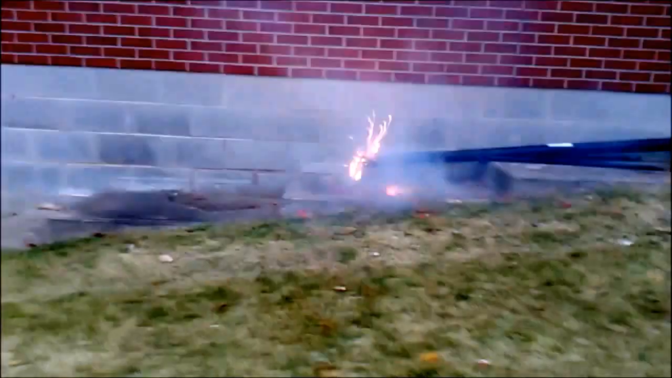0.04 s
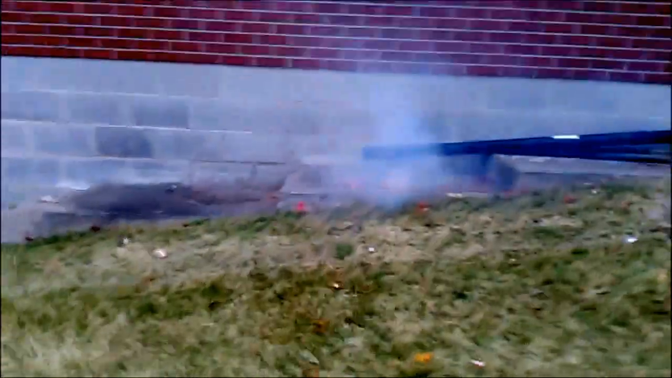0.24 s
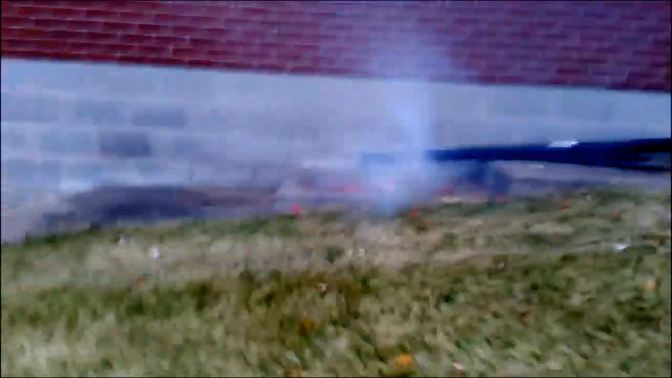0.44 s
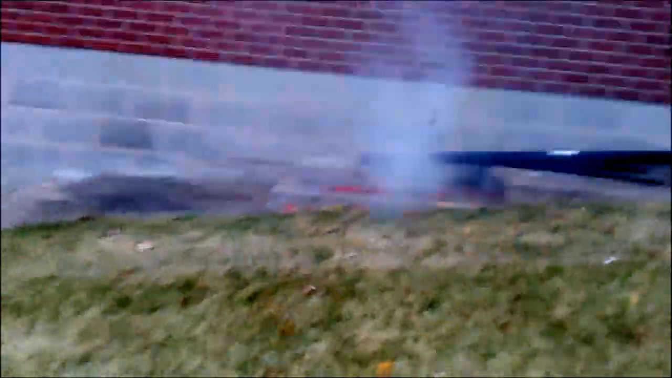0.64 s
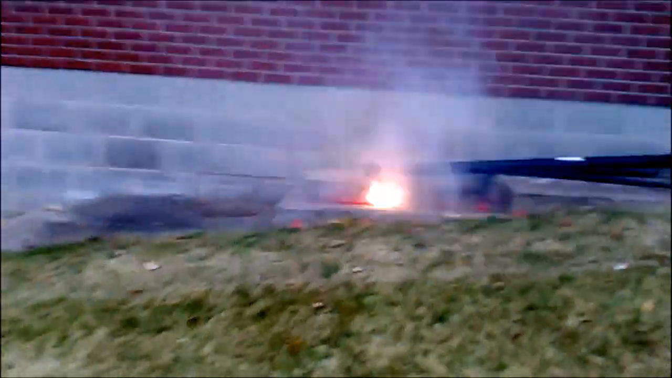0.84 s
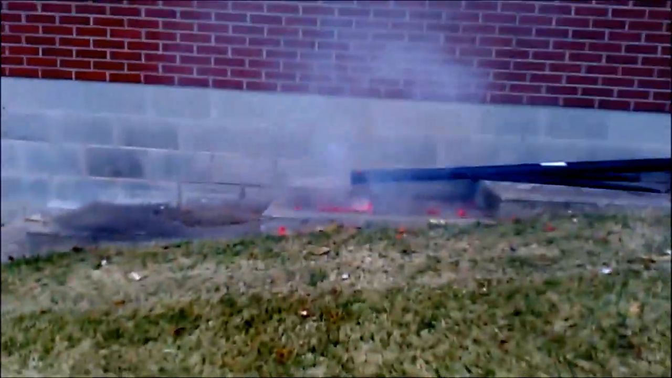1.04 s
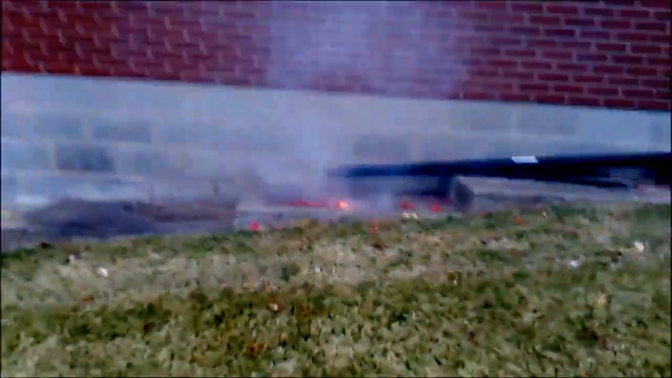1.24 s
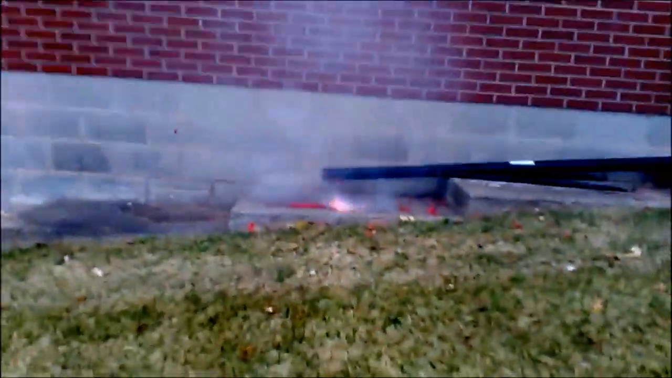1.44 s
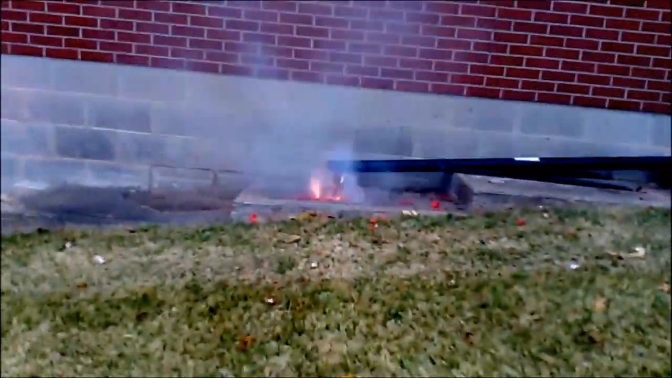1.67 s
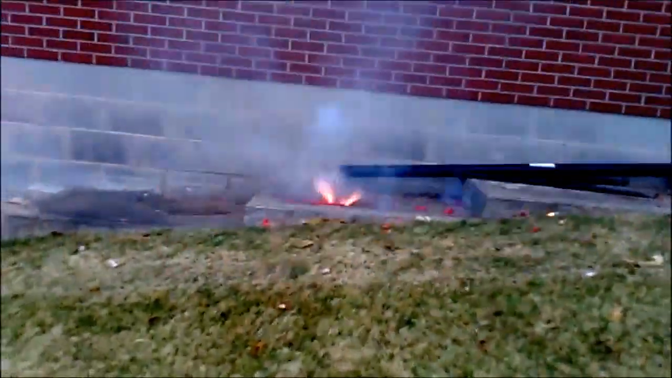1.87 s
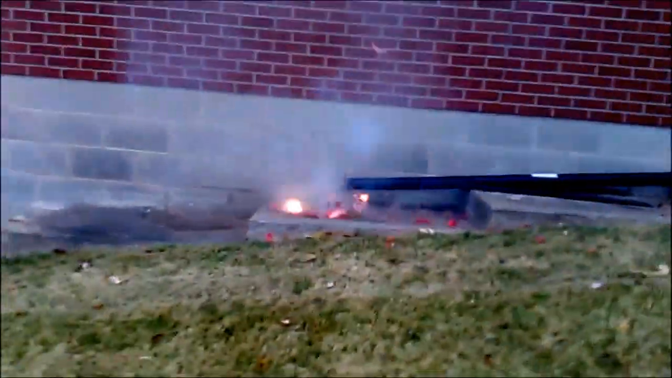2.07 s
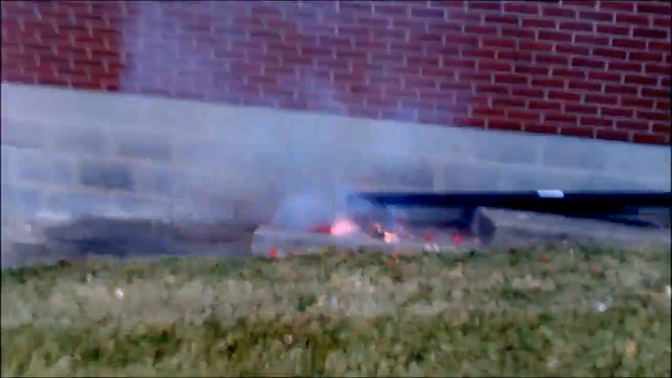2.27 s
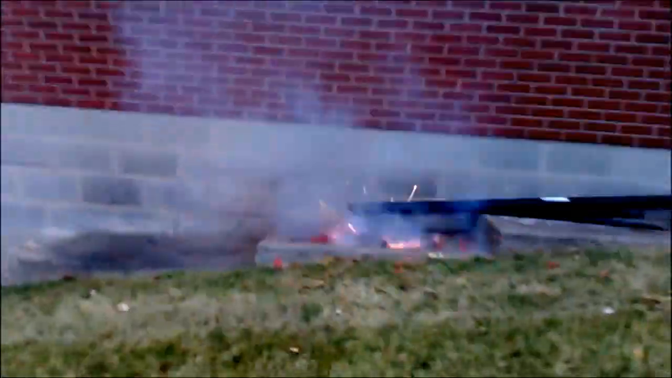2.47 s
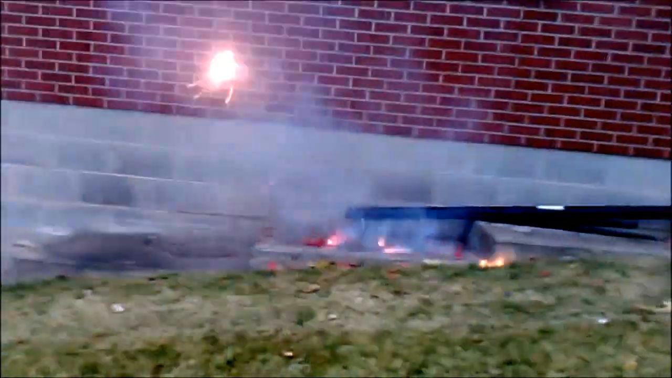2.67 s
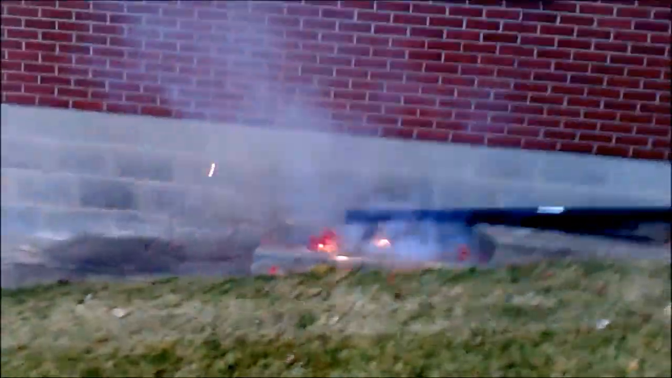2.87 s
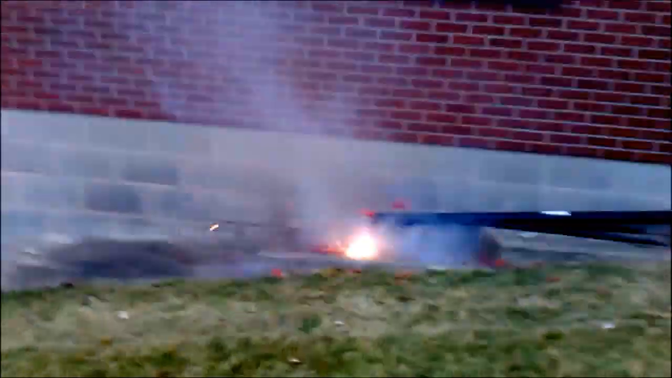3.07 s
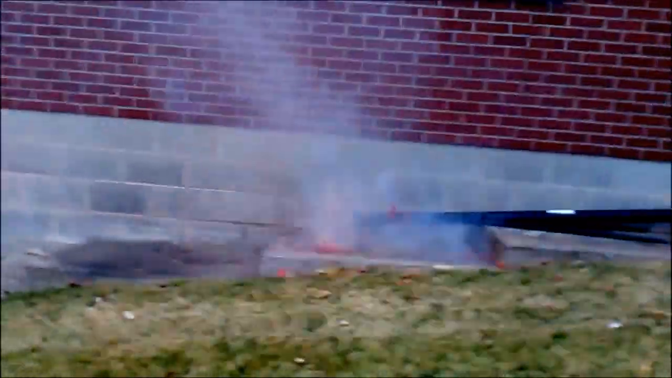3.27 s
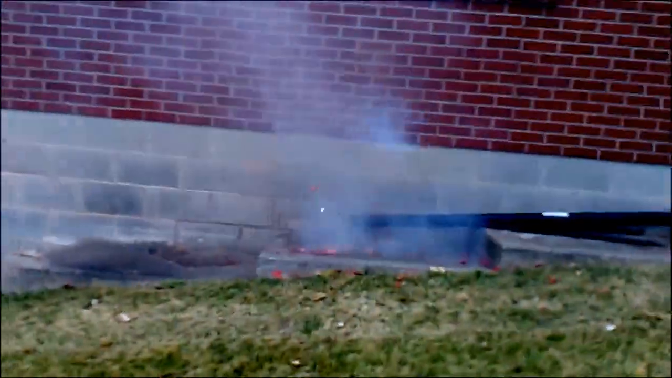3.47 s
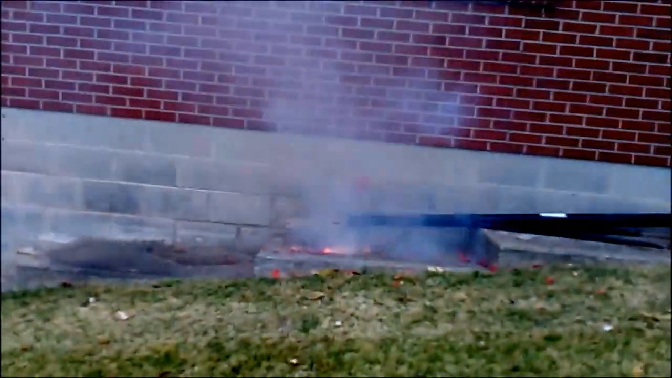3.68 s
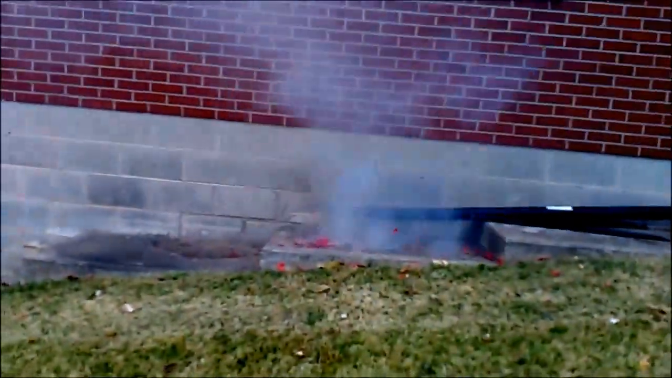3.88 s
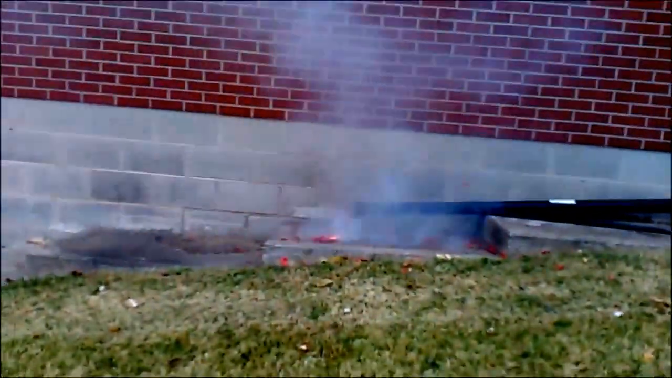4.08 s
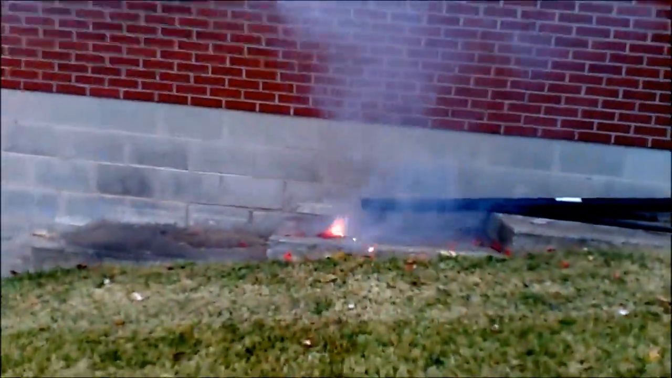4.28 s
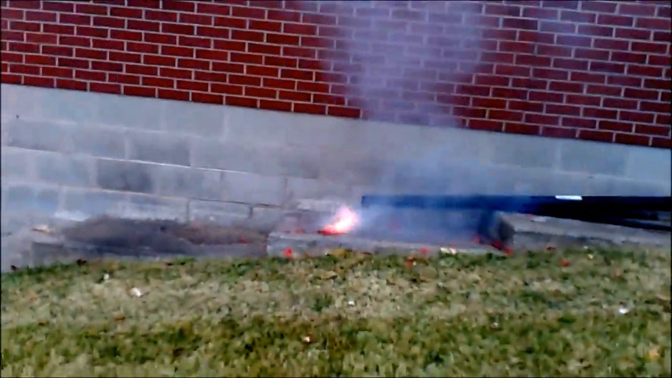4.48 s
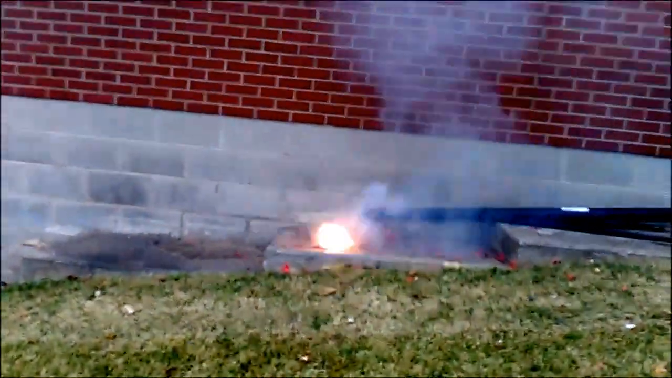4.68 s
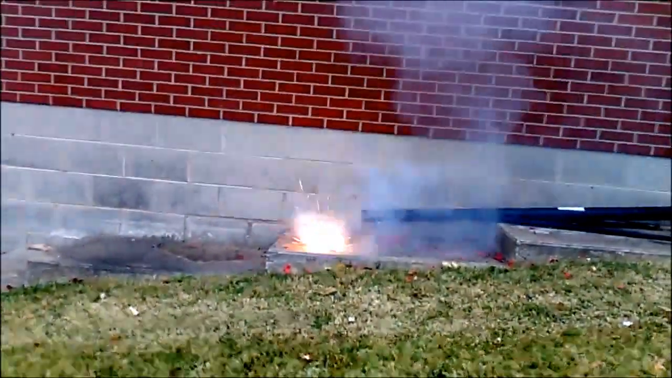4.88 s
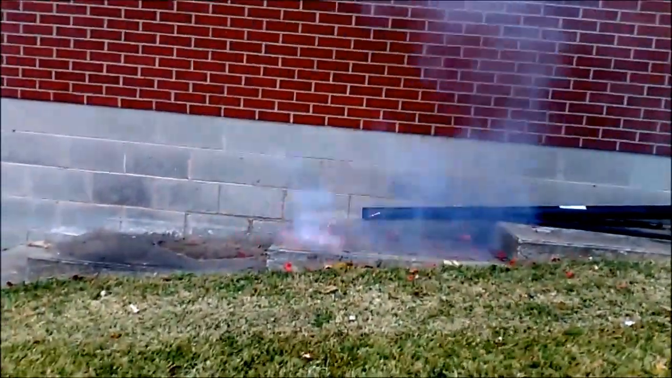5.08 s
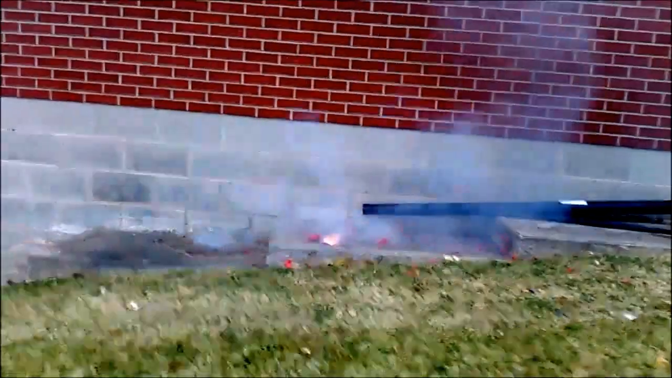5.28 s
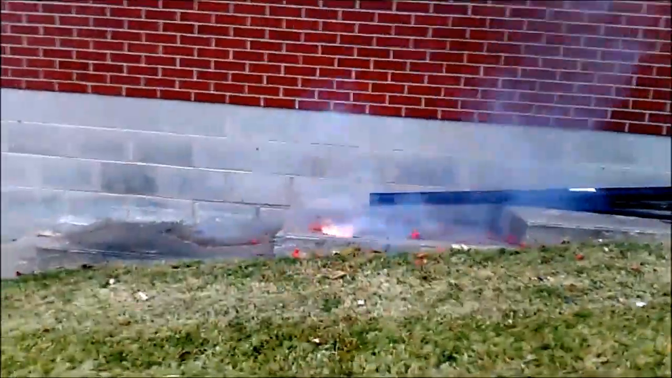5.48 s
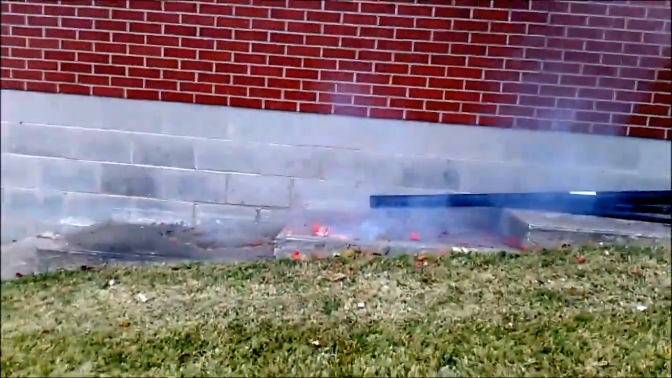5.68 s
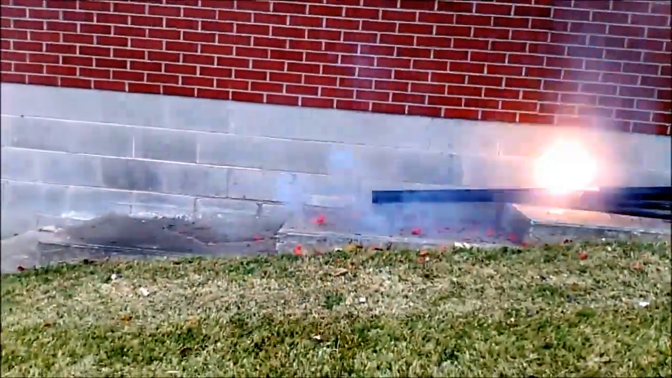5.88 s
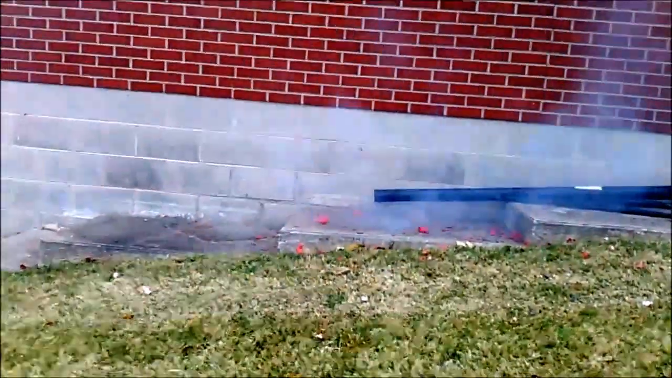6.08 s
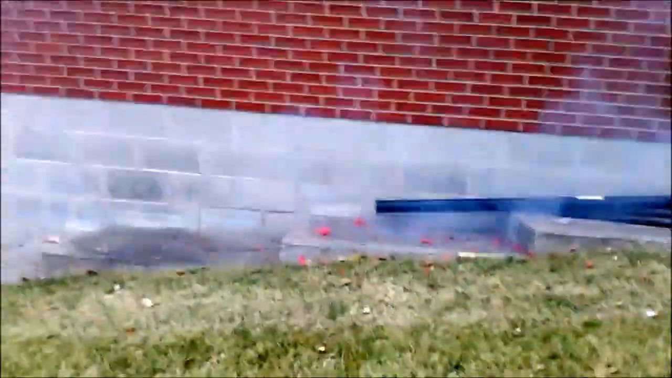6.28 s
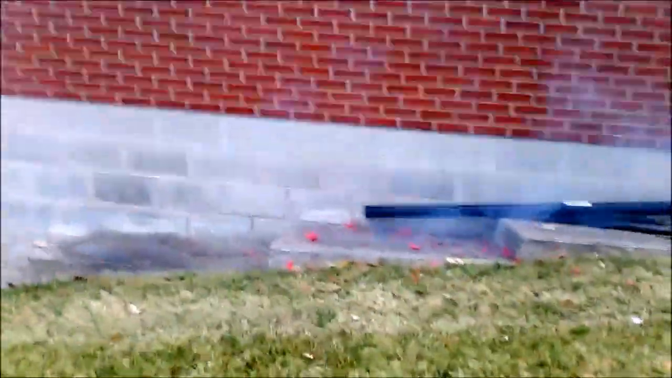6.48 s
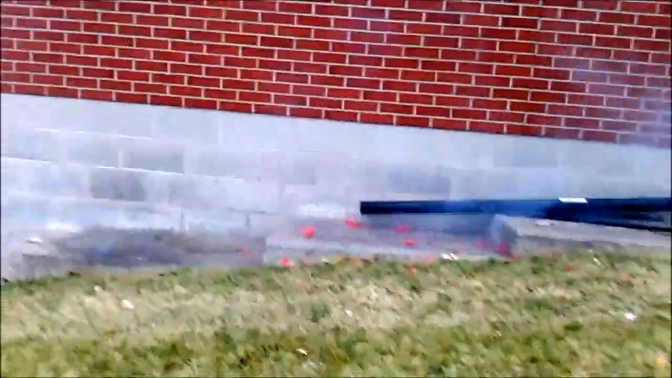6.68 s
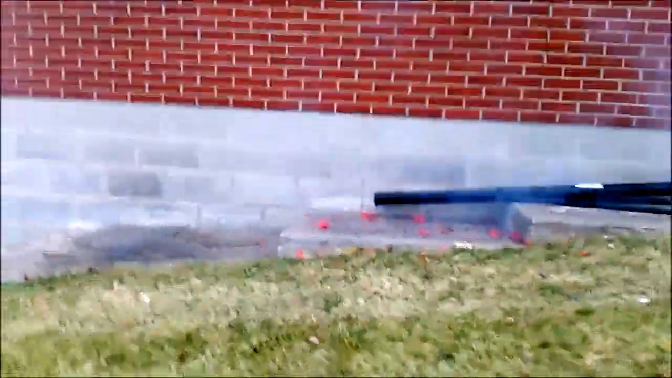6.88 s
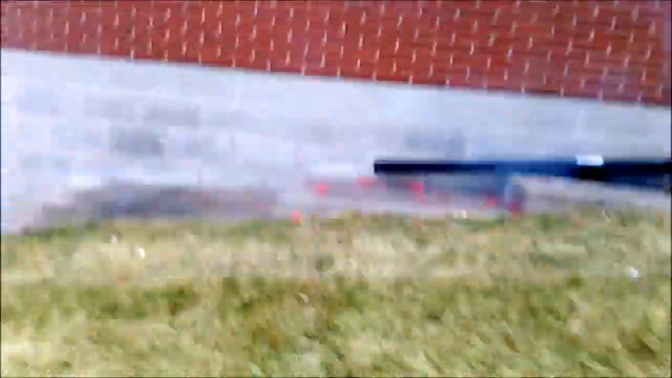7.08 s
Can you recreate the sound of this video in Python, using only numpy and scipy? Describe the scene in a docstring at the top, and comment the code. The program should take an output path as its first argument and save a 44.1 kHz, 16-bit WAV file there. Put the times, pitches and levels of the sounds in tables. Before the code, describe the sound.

The stretch opens mid-run, with a heavy low rumble and a tight cluster of firecracker bangs until about 0.25 s, then a brief gap of rolling echo with sharp slaps from house fronts near 0.4-0.5 s and a little wind buffeting. From 0.63 s cracks resume irregularly, and from 1.7 to 3.7 s they come thick and fast, several to ten or so a second, merging with bright wall clatter into a continuous roar. From 3.9 s they arrive in looser groups, with small gaps around 4.5 and 5.6 s and a dense burst near 4.8-5.4 s. The last bangs fall at 5.86-6.14 s. Throughout, close overloaded microphones flatten the peaks and thump dully; the right side chokes, ticks and spits, reopening in gaps. One snappy echo lands at 6.43 s, then the roar decays to nearly silent outdoor air by about 7.1 s.

```python
"""Firecracker string at a house wall, overloaded recorder.

A string of firecrackers burns on a slab at the foot of a brick wall, heard from the lawn a few metres away.
Each bang is a sharp pulse plus noise scattered by wall and ground; slower noise rolls back from the houses
around, so the run merges into a roar that dies away. Rumble, breeze and outdoor air are shaped noise.
A limiter flattens the bangs, both microphones thump, and the right one chokes for long stretches."""
import sys
import numpy as np
from scipy import signal
from scipy.fft import rfft, irfft
from scipy.io import wavfile

SR = 44100
rng = np.random.default_rng(int(sys.argv[2]) if len(sys.argv) > 2 else 0)


def output_pcm(signal):
    """Save a mono or channel-first signal as 16-bit PCM at the path in sys.argv[1].

    Samples are clipped to [-1, 1] before scaling.
    """
    pcm = np.clip(np.atleast_2d(signal).T, -1, 1) * 32767
    wavfile.write(sys.argv[1], SR, np.round(pcm).astype(np.int16))


N = 314433
TIME = np.arange(N) / SR
CUTOFF_HZ = 15900


def from_db(db):
    """Decibels to gain."""
    return 10 ** (np.asarray(db) / 20)


def at_hz(points, hz):
    """Read a table on a log-frequency axis."""
    f, value = np.transpose(points)
    return np.interp(np.log(np.maximum(hz, 1)), np.log(f), value)


def butter(x, hz, kind, order=2):
    """Butterworth filter along time."""
    sos = signal.butter(order, hz, kind, fs=SR, output="sos")
    return signal.sosfilt(sos, x + 1e-18)


def add(out, s, x):
    """Mix x into out from time s on; s may lie before zero."""
    i = int(round(s * SR))
    part = x[..., max(-i, 0):N - i]
    start = max(i, 0)
    out[..., start:start + part.shape[-1]] += part


def play(rows, response):
    """Start one response at each (s, dB) row; a row may lie before time zero."""
    s, db = np.transpose(rows)[:2]
    clicks = np.bincount(np.round((s + 1) * SR).astype(int), from_db(db), N + SR)
    return signal.fftconvolve(clicks[None], np.atleast_2d(response), axes=1)[:, SR:SR + N]


def window(start_s, end_s):
    """Slice of samples between two times."""
    return slice(*np.searchsorted(TIME, [start_s, end_s]))


def coloured_noise(spectrum):
    """Unrelated noise on two channels; rms 1."""
    gain = from_db(at_hz(spectrum, np.fft.rfftfreq(N, 1 / SR)))
    x = irfft(rfft(rng.standard_normal((2, N))) * gain, N)
    return x / x.std()


def grainy(size, grain_db, grain_s):
    """Stereo noise made of separate reflections of uneven strength; rms 1."""
    knots = np.linspace(0, size, int(size / (grain_s * SR)) + 2)
    strengths_db = grain_db * rng.standard_normal((2, len(knots)))
    x = rng.standard_normal((2, size))
    x *= from_db([np.interp(np.arange(size), knots, side) for side in strengths_db])
    return x / x.std()


def diffuse(spectrum, envelope, t, grain_db=3.5, grain_s=.003):
    """Countless reflections: narrow bands of stereo noise, each under envelope(Hz)."""
    white = [grainy(len(t), grain_db, grain_s) for _ in range(2)]
    edges_hz = np.geomspace(30, 17000, 28)
    out = 0
    for k, (low, high) in enumerate(zip(edges_hz, edges_hz[1:])):
        hz = np.sqrt(low * high)
        # neighbouring bands draw on different noise
        band = butter(white[k % 2], [low, high], "band") * np.sqrt(SR / 2)
        out = out + band * from_db(at_hz(spectrum, hz)) * envelope(hz)
    return out


LEFT_LAG_S = 0.00042


def from_the_right(x):
    """One wavefront on both microphones; it reaches the left one a little later."""
    return np.array([np.interp(TIME - LEFT_LAG_S, TIME, x), x])


# Firecracker bangs and microphone thumps; the weakest rows are almost only thumps.
# Each row: start in seconds, relative strength in dB, relative left microphone thump in dB,
# relative right microphone thump in dB.
BANGS = [(-.15, 8, -30, -32), (-.04, -10, -31, -29), (0.042, -30, -24, -16), (.109, -18, -8, -10),
         (0.131, -6.5, -9, -12), (.151, 5.5, -28, -9), (0.203, -13, -11, -9), (0.2221, -4.5, -17, -37),
         (.632, -3.5, -7, -20), (.684, 13.5, -12, -22), (.823, 7.5, -27.5, -38), (0.869, -37, -42, -9.5),
         (.964, 1.5, -7.5, -22), (1.006, -0.5, -31, -14), (1.234, 0.5, -8, -13.5), (1.347, 0.5, -11, -15),
         (1.392, -12.5, -32, -7.5), (1.708, 8, -10, -11), (1.722, 4.5, -30, -25), (1.766, 7.5, -36, -12),
         (1.797, -3, -31, -15), (1.9565, 5, -14, -39), (2.056, 1.5, -11, -8), (2.152, 10, -10, -36),
         (2.196, -7, -36, -8), (2.236, -10, -7, -14), (2.254, 11.5, -7, -30), (2.304, 0.5, -31, -10),
         (2.331, -23, -32, -7), (2.35, -2.5, -30, -17), (2.459, 6.5, -34, -36), (2.5, 0, -34, -10),
         (2.521, 5.5, -30, -12), (2.6, 3, -11.5, -29), (2.653, -18, -27, -10.5), (2.719, 8.5, -7, -38),
         (2.809, 0.5, -26, -8), (2.826, -17, -30, -10), (2.902, 12, -17, -39), (2.925, -2, -30, -34),
         (2.977, 7, -29, -13.5), (3.046, 5, -19, -7.5), (3.129, 2, -19, -8), (3.143, 11.5, -13, -41),
         (3.187, 1.5, -30, -11.5), (3.233, -6, -13, -9), (3.268, 5.5, -12, -14), (3.325, -1.5, -24, -11),
         (3.435, 6.5, -4, -34), (3.491, -29, -30, -9.5), (3.518, -1.5, -30, -9), (3.531, 7.5, -30, -9),
         (3.591, 7, -30, -16), (3.655, -44, -41, -11.5), (3.908, 8, -10, -15), (3.95, -8, -37, -11),
         (4.082, 7, -6.5, -13), (4.101, -9, -12, -8.5), (4.115, -2.5, -30, -11), (4.284, 5.5, -4.5, -24),
         (4.328, -34, -32, -9.5), (4.373, -1, -33.5, -14.5), (4.649, 4.5, -9, -11.5),
         (4.7354, -1.5, -10, -35), (4.831, 9, -5, -24), (4.876, 0, -30, -9), (4.904, -13, -27, -9),
         (4.936, -1, -27, -4.5), (4.992, -9, -30, -6), (5.017, 8.5, -32, -9), (5.12, 8, -42, -50),
         (5.158, 5.5, -12, -37), (5.201, -3, -8, -20), (5.234, 3.5, -28, -13), (5.285, -1, -30, -10),
         (5.349, 1, -32, -13), (5.387, -15, -32, -13), (5.488, -2, -8, -24), (5.8565, 6.5, -8, -16),
         (5.872, 7, -30, -14), (5.918, 1, -5, -15), (6.017, 6.5, -27, -36), (6.07, -45, -33, -10),
         (6.13, -23, 1, -33), (6.143, -5.5, -32, -9.5)]
# Bare crack spectrum. Each row: frequency in Hz, relative level in dB.
CRACK_SPECTRUM = [(30, -40), (200, 5), (800, 0.5), (2200, 7), (4000, 5), (8000, 0.5), (16000, -11)]


def crack(size=512):
    """The shock front: the most abrupt (minimum-phase) pulse that has the crack's spectrum; peak 1."""
    gain = from_db(at_hz(CRACK_SPECTRUM, np.fft.rfftfreq(size, 1 / SR)))
    cepstrum = irfft(np.log(gain))
    causal = 2 * cepstrum[:size // 2] * (np.arange(size // 2) > 0)
    pulse = irfft(np.exp(rfft(causal, size)))
    return pulse / np.abs(pulse).max()


# Scatter from wall, slab and ground. Each row: frequency in Hz, relative level in dB per Hz.
NEAR_SPECTRUM = [(30, -82), (90, -50.5), (250, -45.5), (500, -43), (1000, -44.5), (2000, -42.5),
                 (3200, -45), (6000, -47.5), (10000, -52), (13000, -55), (16000, -59.5)]
# Wall corner and hollow metal pole colour the scatter. Each row: centre in Hz, half width in Hz, boost or cut in dB.
RINGS = [(507, 14, 7), (772, 48, 3), (903, 26, 4), (990, 18, 3.5), (1137, 85, 2.5), (1822, 22, 9.5),
         (1768, 12, 3), (620, 50, -2), (835, 15, -3), (947, 12, -3), (1050, 20, -3), (1520, 45, -1.5),
         (1915, 25, -3), (2030, 25, 2.5)]
# Scatter gain: left in dB, right in dB.
NEAR_DB = [-4.5, -0.5]
NEAR_T60_S, NEAR_HOLD_S, NEAR_RISE_S = 0.28, 0.03, 0.0007
# top of the scatter: hard snap, hold, faster decay
TOP_HZ, SNAP_DB, SNAP_S, TOP_HOLD_S, TOP_LOSS_DB_PER_S = 7340, 4.5, 0.0019, 0.043, 240


def clatter(uneven_db=1.5, count=30):
    """Bright scatter from close by; every firecracker has jumped to a new spot, so each has its own colour."""
    t = np.arange(SR // 2) / SR
    hz = np.fft.rfftfreq(len(t), 1 / SR)
    knots_hz = np.geomspace(200, 16000, count)
    colour_db = at_hz(NEAR_SPECTRUM, hz)
    colour_db = colour_db + sum(db / (1 + ((hz - centre) / width) ** 2) for centre, width, db in RINGS)
    rise = 1 - np.exp(-t / NEAR_RISE_S)
    envelope = rise * from_db(-60 * np.maximum(t - NEAR_HOLD_S, 0) / NEAR_T60_S)
    top_share = 1 - 1 / (1 + (hz / TOP_HZ) ** 4)
    top_gain = from_db(SNAP_DB * np.exp(-t / SNAP_S) - TOP_LOSS_DB_PER_S * np.maximum(t - TOP_HOLD_S, 0))
    out = np.zeros((2, N))
    for s, db, *_ in BANGS:
        uneven = uneven_db * rng.standard_normal(count) / (1 + knots_hz / 8000)
        own_db = np.interp(hz, knots_hz, uneven)
        noise = grainy(len(t), grain_db=3.5, grain_s=.002)
        scatter = rfft(noise) * from_db(db + colour_db + own_db)
        body = irfft(scatter * (1 - top_share), len(t))
        top = irfft(scatter * top_share, len(t))
        add(out, s, (body + top * top_gain) * envelope * np.sqrt(SR / 2))
    return out * from_db(NEAR_DB)[:, None]


# Neighbourhood echoes. Each row: frequency in Hz, relative level in dB per Hz.
FAR_SPECTRUM = [(30, -90), (90, -88), (250, -67.5), (500, -66), (1000, -65), (1600, -63), (2200, -60.5),
                (3300, -61.5), (4000, -66.5), (6000, -66.5), (10000, -76.5), (13000, -88), (16000, -100)]
# Echo decay. Each row: frequency in Hz, t60 in seconds.
FAR_T60_S = [(60, .5), (250, 0.48), (500, 0.88), (800, 1.21), (2000, 1.32), (3200, 1.01), (4200, 0.8),
             (8000, 0.75), (16000, 0.49)]
# Echo gain: left in dB, right in dB.
FAR_DB = [-1, 7]
# Extra decay beyond the last houses, where little comes back: left in dB per second, right in dB per second.
FAR_EDGE_DB_PER_S = [131, 46]
FAR_BUILD_S, FAR_EDGE_S = 0.22, 0.72


def roll(lumpy_db=2.5, count=3):
    """Ever more houses answer, in uneven clumps; then each band dies at its own rate."""
    t = np.arange(int(1.3 * SR)) / SR
    swell = np.sqrt(np.minimum(t / FAR_BUILD_S, 1))
    late_s = np.maximum(t - FAR_BUILD_S, 0)
    edge_loss_db = np.outer(FAR_EDGE_DB_PER_S, np.maximum(t - FAR_EDGE_S, 0))
    knots_s = np.arange(0, 1.33, .03)

    def envelope(hz):
        """Level of one band of echoes over time."""
        clumps_db = np.interp(t, knots_s, lumpy_db * rng.standard_normal(len(knots_s)))
        return swell * from_db(clumps_db - 60 * late_s / at_hz(FAR_T60_S, hz) - edge_loss_db)

    # the bangs take turns with a few different responses
    rolls = sum(play(BANGS[k::count], diffuse(FAR_SPECTRUM, envelope, t)) for k in range(count))
    return rolls * from_db(FAR_DB)[:, None]


# Reflections arriving in step, ringing at one pitch, hollow or bright.
# Each row: centre in seconds, pitch in Hz, band gain in dB, half length in seconds.
CLUMPS = [(0.255, 4100, 6, 0.055), (.38, 2850, 1.5, 0.041), (0.43, 2400, 3.5, 0.04),
          (0.868, 776, 10.5, 0.02), (.906, 2290, 2, .025), (1.02, 794, 4, .02), (1.068, 1188, 7.5, 0.053),
          (1.307, 1880, 4.5, 0.051), (1.36, 487, 5.5, .025), (1.45, 4100, 6, 0.03), (1.57, 2376, 3, 0.035),
          (2.028, 1020, 7, .018), (2.304, 495, 10.5, 0.01), (2.403, 1073, 7.5, 0.03),
          (2.624, 530, 6, 0.021), (2.672, 970, 10, 0.022), (2.736, 415, 10, 0.011), (2.791, 885, 8, 0.014),
          (3.06, 527, 6, 0.026), (3.172, 399, 9.5, 0.038), (3.377, 1720, 3, 0.03), (3.585, 525, 4, 0.019),
          (3.63, 455, 8.5, 0.016), (3.673, 1010, 8.5, 0.024), (3.805, 3140, 3, 0.022),
          (3.891, 2700, -1, .02), (3.95, 641, 5.5, 0.043), (3.98, 980, 10.5, 0.025), (4.017, 3730, 9, .018),
          (4.166, 889, 13.5, 0.019), (4.207, 4030, 6.5, 0.016), (4.41, 7490, 7, 0.031),
          (4.524, 2075, 5.5, 0.023), (4.582, 1585, 9, 0.019), (4.644, 2700, 11, 0.011),
          (4.926, 774, 7.5, 0.046), (4.982, 1900, 9.5, 0.0073), (5.013, 345, 13.5, 0.025),
          (5.067, 1080, 9, 0.025), (5.333, 1330, 10.5, 0.023), (5.419, 1048, 12, 0.021),
          (5.528, 1790, 7, 0.017), (5.903, 1050, 11, 0.011), (5.993, 990, 8, 0.021), (6.072, 900, 6, 0.015),
          (6.176, 3600, 8, 0.016), (6.356, 1900, 2.5, .06), (6.45, 2932, 0.5, .13)]


def clumped(x, half_octaves=0.22):
    """Reflections in step reinforce one narrow band of the scatter for a moment."""
    out = x.copy()
    for s, hz, db, half_s in CLUMPS:
        span = window(s - 3 * half_s, s + 3 * half_s)
        edges_hz = [hz / 2 ** half_octaves, hz * 2 ** half_octaves]
        band = butter(x[:, span], edges_hz, "band", order=1)
        bell = np.exp(-np.square((TIME[span] - s) / half_s))
        out[:, span] += (from_db(db) - 1) * bell * band
    return out


# Single sharp echoes from houses across the street. Each row: start in seconds, relative peak in dB, pitch in Hz.
SLAPS = [(0.433, -9, 2320), (.5045, -1, 2100), (4.574, 0, 2230), (6.4346, -1.5, 2420), (6.718, -25.5, 853)]


def slaps(cycles=6.2, low_hz=600, top_ratio=2.2, slap_db=7):
    """A flat house front returns a crack as one short snap without bass or top."""
    t = np.arange(SR // 50) / SR
    out = np.zeros(N)
    for s, db, hz in SLAPS:
        decay = from_db(slap_db + db - 60 * hz * t / cycles)
        snap = decay * np.cos(2 * np.pi * hz * t)
        add(out, s, butter(snap, min(top_ratio * hz, CUTOFF_HZ), "low"))
    return butter(out, low_hz, "high")


# Heavy rumble at the start. Each row: time in seconds, level in dB.
RUMBLE = [(0, -26), (.08, -18), (.15, -26), (.2, -44), (.3, -98.5)]
# Rumble colour. Each row: frequency in Hz, relative level in dB per Hz.
RUMBLE_COLOUR = [(30, -34), (90, -6), (150, -9.5), (220, -5.5), (320, -13), (800, -33), (16000, -92)]


def rumble():
    """Low noise that swells and fades within the first moments."""
    return coloured_noise(RUMBLE_COLOUR) * from_db(np.interp(TIME, *np.transpose(RUMBLE)))


# Low thuds on the left microphone. Each row: centre in seconds, peak in dB, pitch in Hz, width in seconds.
LEFT_THUDS = [(.104, -15, 200, .007), (.2937, -9, 160, .004), (.62, -22, 110, .004),
              (1.6155, -15, 150, .0025), (7.0135, -26, 125, .0045)]


def left_thuds():
    """Brief low wave packets on the left microphone."""
    out = np.zeros((2, N))
    for at, db, hz, width in LEFT_THUDS:
        bell = np.exp(-.5 * ((TIME - at) / width) ** 2)
        out[0] += from_db(db) * bell * np.cos(2 * np.pi * hz * (TIME - at))
    return out


# Breeze on the microphones. Each row: time in seconds, left level in dB, right level in dB.
BREEZE = [(0, -41, -37), (.3, -27, -37), (.42, -39, -20.5), (.55, -39, -32), (1.2, -38.5, -29.5),
          (1.6, -39.5, -32.5), (3.7, -41, -41), (4.5, -67, -60), (6.3, -50, -64), (6.75, -68, -66),
          (6.9, -54, -64), (7.05, -47, -58), (7.13, -61, -68)]
# Breeze colour. Each row: frequency in Hz, relative level in dB.
BREEZE_COLOUR = [(25, -25), (55, -4), (110, -5.5), (200, -10), (400, -31.5), (1000, -82), (16000, -94)]


def breeze():
    """Low buffeting noise, different on each microphone."""
    s, left_db, right_db = np.transpose(BREEZE)
    levels_db = [np.interp(TIME, s, db) for db in (left_db, right_db)]
    return coloured_noise(BREEZE_COLOUR) * from_db(levels_db)


# Quiet outdoor air. Each row: frequency in Hz, relative level in dB per Hz.
AIR_COLOUR = [(30, 2), (70, 3), (300, -9), (1000, -5.5), (3000, -16), (8000, -14.5), (16000, -21)]
AIR_DB = -61.5


def air():
    """Steady faint noise of the outdoors."""
    return from_db(AIR_DB) * coloured_noise(AIR_COLOUR)


def scene(crack_db=9):
    """Sound pressure at the two microphones; cracks come from the right, slaps from the left."""
    cracks = -from_db(crack_db) * from_the_right(play(BANGS, crack())[0])
    echoes = from_the_right(slaps())[::-1]
    reflections = clumped(clatter() + roll())
    return cracks + echoes + reflections + rumble() + left_thuds() + breeze() + air()


def limiter(x, ceiling_db=-10.5, smooth_s=0.0019, react_s=0.00019, release_db_per_s=260, top=0.41, lopsided=0.15):
    """The gain falls just after the power rises and returns slowly; the shock fronts overshoot and are squashed."""
    r = np.exp(-1 / (smooth_s * SR))
    power = signal.lfilter([1 - r], [1, -r], x ** 2)
    level_db = 10 * np.log10(power + 1e-12)
    # peak hold with a linear fall in dB
    fall_db = release_db_per_s * TIME
    level_db = np.maximum.accumulate(level_db + fall_db, axis=1) - fall_db
    level_db = np.array([np.interp(TIME - react_s, TIME, side, left=0) for side in level_db])
    held = x / np.sqrt(1 + from_db(level_db - ceiling_db) ** 2)
    return top * (np.tanh(held / top + lopsided) - np.tanh(lopsided))


# Right microphone works only between overloads. Each row: opens in seconds, shuts in seconds, gain in dB.
RIGHT_OPEN = [(.02, 0.021, 1.5), (0.054, 0.156, -2.5), (0.268, 0.271, 0.5), (0.364, .632, -1),
              (0.644, 0.681, -1), (0.722, .738, -11), (0.806, 0.808, -0.5), (0.895, 0.969, -5),
              (1.074, 1.075, 1), (1.17, 1.237, -2.5), (1.266, 1.35, 0.5), (1.429, 1.443, -1),
              (1.508, 1.709, -3), (1.889, 1.89, 1.5), (2.05, 2.064, -10), (2.091, 2.105, 0.5),
              (2.146, 2.15, -7), (2.229, 2.233, 0), (2.292, 2.3, -10.5), (2.32, 2.33, -9),
              (2.412, 2.42, -1.5), (2.573, 2.583, -2), (2.685, 2.701, 0), (2.808, 2.817, -8),
              (2.863, 2.873, -1), (3.116, 3.111, -8), (3.32, 3.321, -9), (3.404, 3.402, 1),
              (3.555, 3.574, -9), (3.698, 3.715, -2), (3.782, 3.911, -1), (3.991, 4.001, -0.5),
              (4.06, 4.096, -5.5), (4.156, 4.174, -2.5), (4.246, 4.289, -5.5), (4.353, 4.65, -2),
              (4.697, 4.718, -2.5), (4.75, 4.835, -1), (4.979, 4.99, 1.5), (5.061, 5.081, -3),
              (5.12, 5.122, -17), (5.16, 5.165, -13), (5.422, 5.437, -1.5), (5.437, 5.49, -4.5),
              (5.513, 5.551, -1), (5.585, 5.861, -2), (5.905, 5.92, -2), (5.95, 6.014, -2.5),
              (6.112, 6.125, 0), (6.19, 6.198, -2.5), (6.28, 7.138, 0)]
LONG_OPEN_S = .04


def openness(swing_db_per_s=1700, settle_db_per_s=900, fade_db_per_s=1300, shut_db_per_s=3000,
             tick_db=-4, tick_share=0.11, tick_db_per_s=5500):
    """Gain of the right microphone in dB. A bang throws its bias out of range, and only the crack ticks through.
    The bias either swings past the working point, letting a short burst by, or settles there slowly."""
    level_db = np.full(N, -120.)
    bang_s = np.array([row[0] for row in BANGS] + [np.inf])
    for opens, shuts, db in RIGHT_OPEN:
        span = window(opens - .1, shuts + .1)
        t = TIME[span]
        next_bang = bang_s[bang_s > shuts - .004][0]
        rise = settle_db_per_s if shuts - opens > LONG_OPEN_S else swing_db_per_s
        loss_db = rise * np.maximum(opens - t, 0)
        loss_db += fade_db_per_s * np.maximum(t - shuts, 0)
        loss_db += shut_db_per_s * np.maximum(t - next_bang, 0)
        level_db[span] = np.maximum(level_db[span], db - loss_db)
    for s, db, *_ in BANGS:
        span = window(s, s + .05)
        tick = tick_db + tick_share * db - tick_db_per_s * (TIME[span] - s)
        level_db[span] = np.maximum(level_db[span], tick)
    return level_db


def choke(x, leak_db=-23, leak_hz=480, split_hz=3500, treble_fade=2.7, treble_lead_db=11.5):
    """A choked microphone passes only a dull trace; sound fades in as it recovers, treble last."""
    level_db = openness()
    body = butter(x, split_hz, "low", order=1)
    treble = x - body
    treble_db = np.minimum(level_db, treble_fade * level_db + treble_lead_db)
    leak = from_db(leak_db) * butter(x, leak_hz, "low")
    return body * from_db(level_db) + treble * from_db(treble_db) + leak


# Spits of the choked right microphone. Each row: start in seconds, starting level in dB, pitch in Hz.
SPITS = [(0.2048, -11.5, 7500), (.732, -17, 6000), (1.477, -23, 6000), (2.293, -21, 6000),
         (2.3213, -15, 8000), (2.511, -27, 6000), (3.0417, -22, 6500), (3.5602, -16, 4500),
         (4.684, -30, 6000), (4.901, -16, 4500), (5.0043, -24, 6000), (5.346, -30, 6000),
         (5.499, -17, 5000), (6.137, -19, 6000)]


def spits(t60=0.013, octaves=0.62):
    """The bias flicks through the working point: each spit is a bright snap a few milliseconds long."""
    t = np.arange(SR // 40) / SR
    out = np.zeros(N)
    for s, db, hz in SPITS:
        edges_hz = [hz / 2 ** octaves, min(hz * 2 ** octaves, CUTOFF_HZ)]
        snap = butter(rng.standard_normal(len(t)), edges_hz, "band", order=1)
        add(out, s, from_db(db - 60 * t / t60) * snap / snap.std())
    return out


def thumps(rows, coupling_hz, rise_hz, damping, sag_db, sag_hz, sag_t60=0.24,
           spread=0.27, skew=0.45, damping_spread=0.36, swell_s=0.00041):
    """A step in the microphone's bias swings through the bass cut: a spike, a trough, then a slow low sag;
    no two alike."""
    t = np.arange(SR // 6) / SR
    out = np.zeros(N)
    for (s, db), (pitch, ring, lean) in zip(rows, rng.standard_normal((len(rows), 3))):
        turn = 2 * np.pi * np.exp(spread * pitch) * t
        own_damping = damping * np.exp(damping_spread * ring)
        snap = np.exp(-own_damping * coupling_hz * turn) * np.cos(coupling_hz * turn + skew * lean)
        sag = from_db(sag_db - 60 * t / sag_t60) * np.sin(sag_hz * turn)
        add(out, s, from_db(db) * (snap - sag) * (1 - np.exp(-t / swell_s)))
    return butter(out, rise_hz, "low", order=1)


# Brief gain changes of the left microphone, mostly chokes.
# Each row: centre in seconds, half width in seconds, gain change in dB.
LEFT_CHOKES = [(0.146, 0.0039, -6), (0.2158, 0.0052, -11), (0.282, 0.0064, -9.5), (.816, 0.0059, -2),
               (1.69, .012, -3), (1.943, 0.0103, -3.5), (2.042, 0.0051, -1), (2.127, 0.016, -3.5),
               (2.302, 0.003, -8.5), (3.049, 0.0027, -9), (3.446, 0.0032, -8.5), (4.066, 0.012, -7.5),
               (4.257, .014, -2.5), (4.724, 0.008, -8.5), (4.927, 0.0065, -10), (4.977, 0.0067, -8),
               (5.569, 0.011, 1.5), (6.105, 0.016, -2), (6.132, 0.0045, -3.5)]
# Dull overload thumps between the bangs. Each row: start in seconds, relative left level in dB,
# relative right level in dB.
THUMPS = [(1.096, -17, -45), (1.209, -8, -45), (1.419, -16, -45), (0.742, -40, -10), (1.611, -45, -19),
          (1.837, -40, -12), (2.014, -40, -14), (2.139, -7, -45), (2.772, -40, -20), (3.562, -40, -17),
          (4.919, -8, -40), (5.213, -40, -14), (5.269, -40, -15), (5.501, -40, -10), (5.945, -40, -11)]
# relative levels: left thump on recovery, larger after a deeper choke; right thump as the bias swings through
RECOVERY_THUMP_DB, CROSSING_THUMP_DB = -19.5, -26


def record(dry, peak=1.0):
    """Limiter, choking and thumps of the two microphones, bass cut, rounded peaks and top cut."""
    left, right = limiter(dry)
    # flat-topped bells
    dips_db = sum(db * np.exp(-.5 * np.square((TIME - s) / width) ** 2) for s, width, db in LEFT_CHOKES)

    left_steps = [(s, db) for s, _, db, _ in BANGS]
    left_steps += [(s + width, RECOVERY_THUMP_DB - db) for s, width, db in LEFT_CHOKES]
    left_steps += [(s, db) for s, db, _ in THUMPS]
    right_steps = [(s, db) for s, _, _, db in BANGS]
    right_steps += [(opens, CROSSING_THUMP_DB + db) for opens, _, db in RIGHT_OPEN]
    right_steps += [(s, db) for s, _, db in THUMPS]

    left_thumps = thumps(left_steps, coupling_hz=178, rise_hz=1400, damping=0.19, sag_db=-27.0, sag_hz=76)
    right_thumps = thumps(right_steps, coupling_hz=131.6, rise_hz=1400, damping=0.32, sag_db=-24.5, sag_hz=59.0)
    left = from_db(1.0 + dips_db) * left + from_db(-3.0) * left_thumps
    right = choke(right) + spits() + from_db(2.0) * right_thumps

    bass_cut = butter(np.array([left, right]), 53, "high")
    rounded = peak * np.tanh(bass_cut / peak)
    return signal.sosfilt(signal.ellip(10, .1, 80, CUTOFF_HZ, fs=SR, output="sos"), rounded)


dry = scene()
out = record(dry)
output_pcm(out)
```